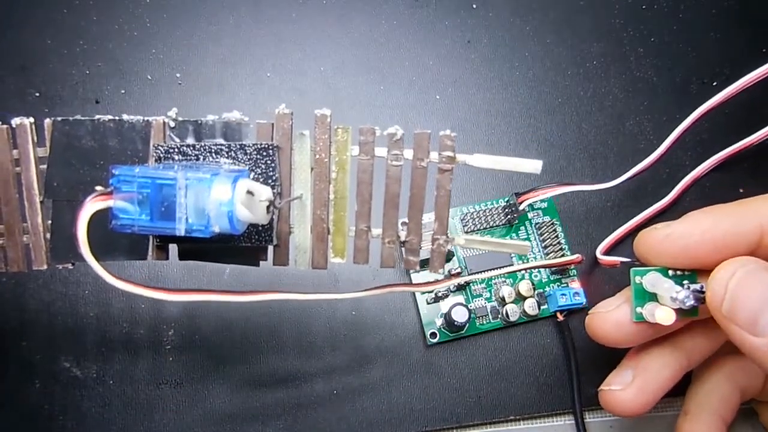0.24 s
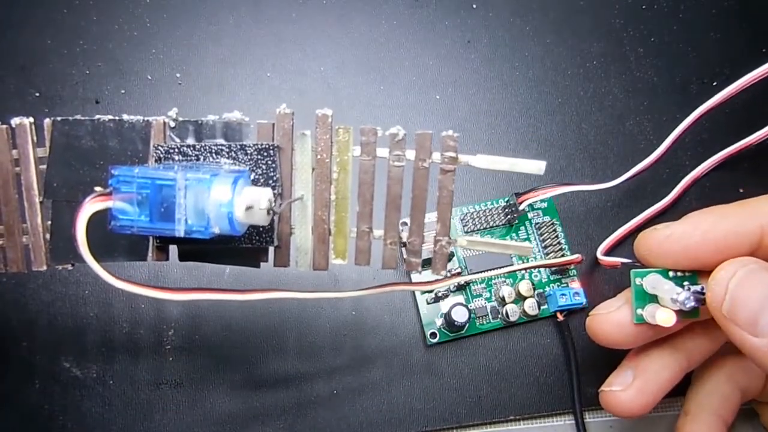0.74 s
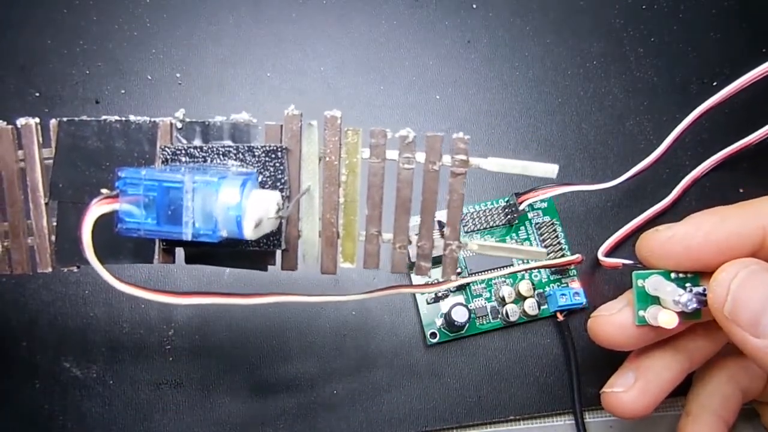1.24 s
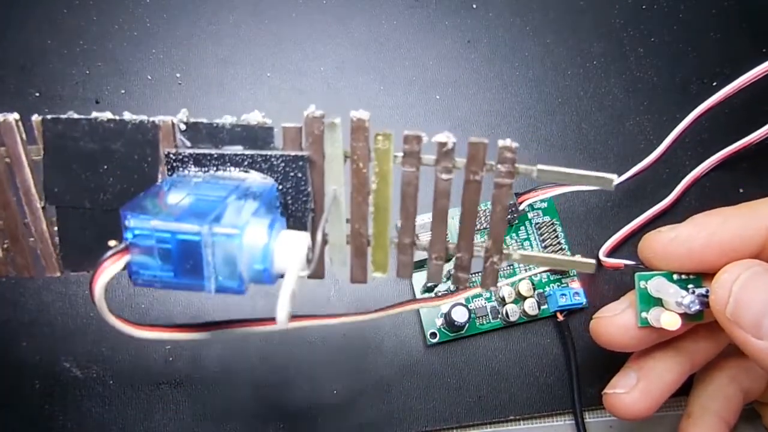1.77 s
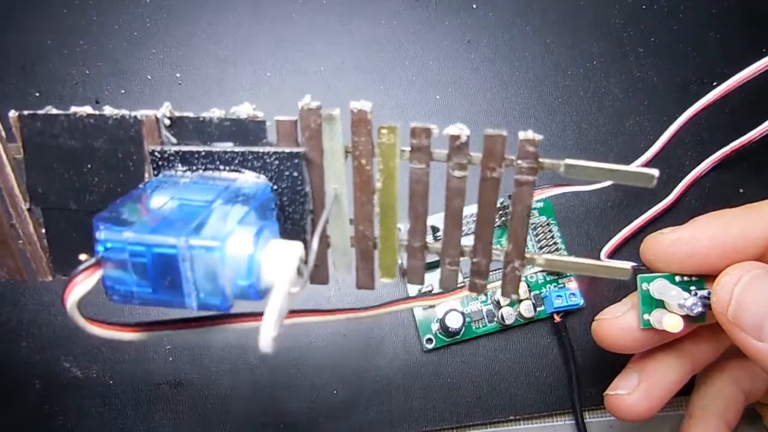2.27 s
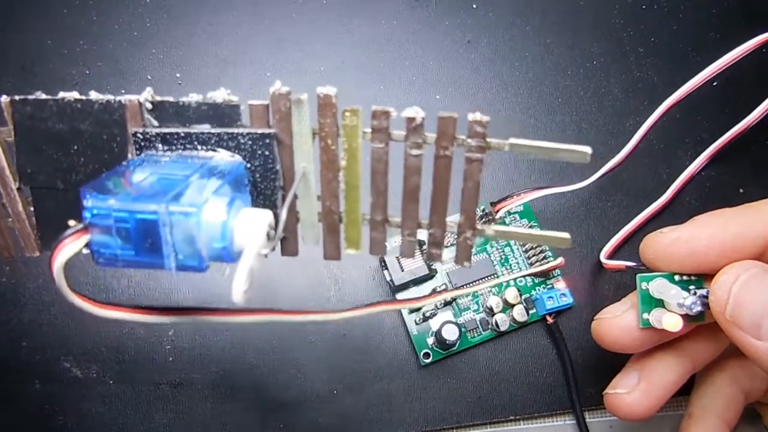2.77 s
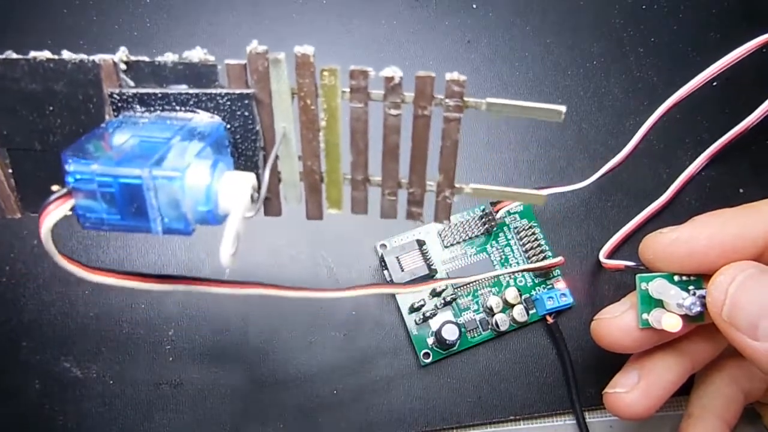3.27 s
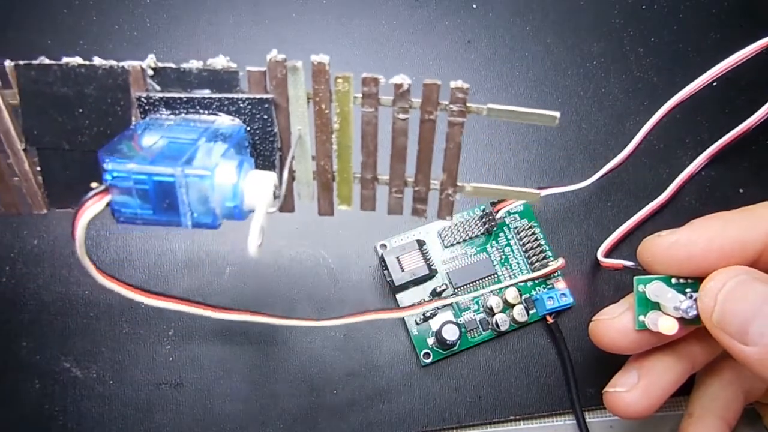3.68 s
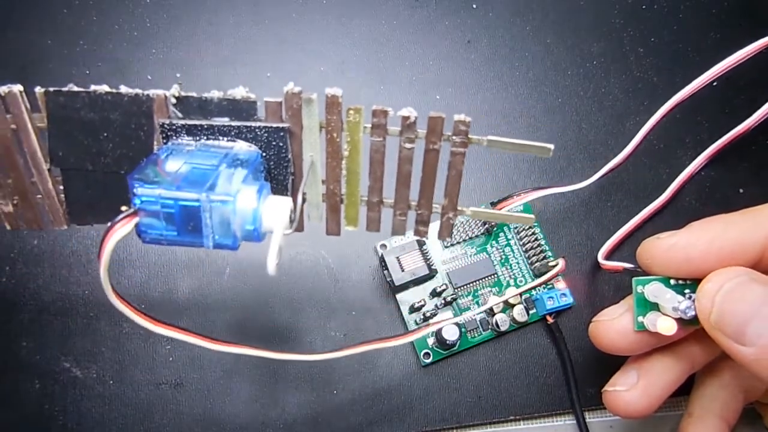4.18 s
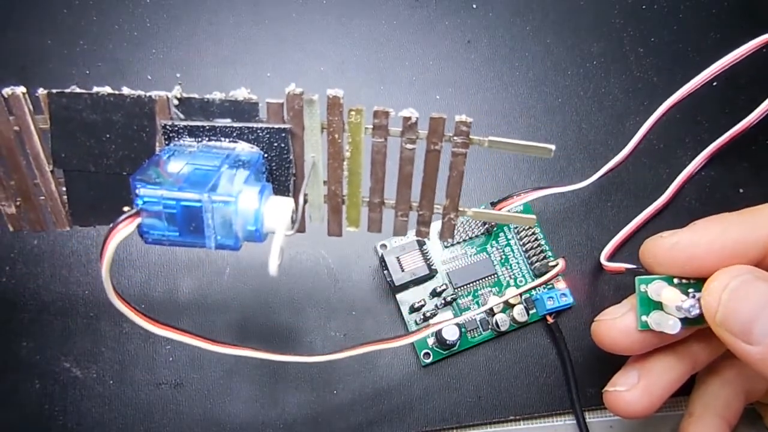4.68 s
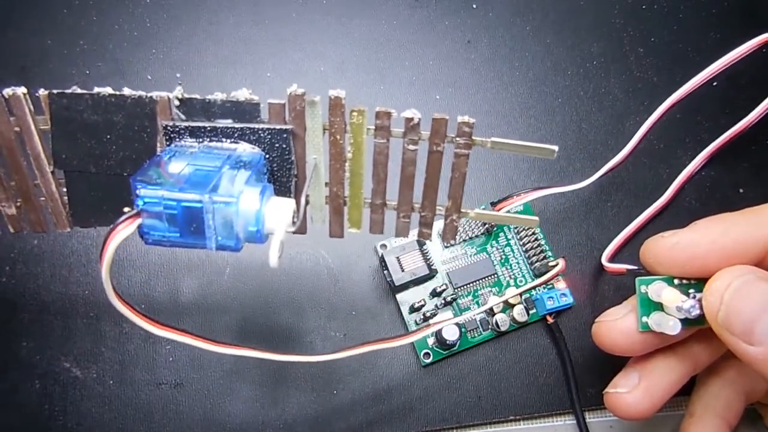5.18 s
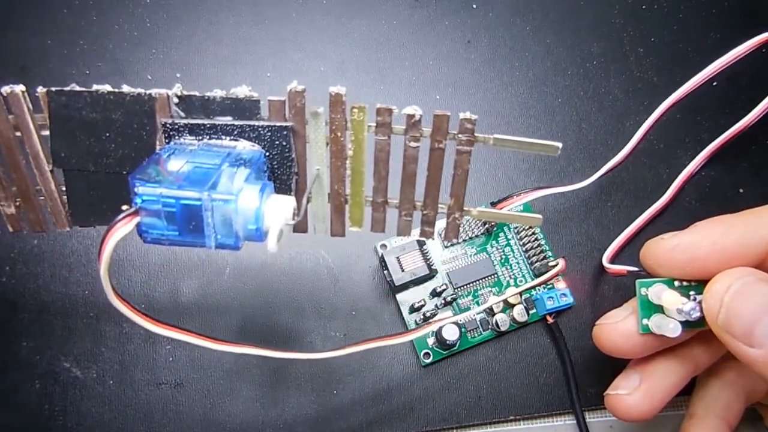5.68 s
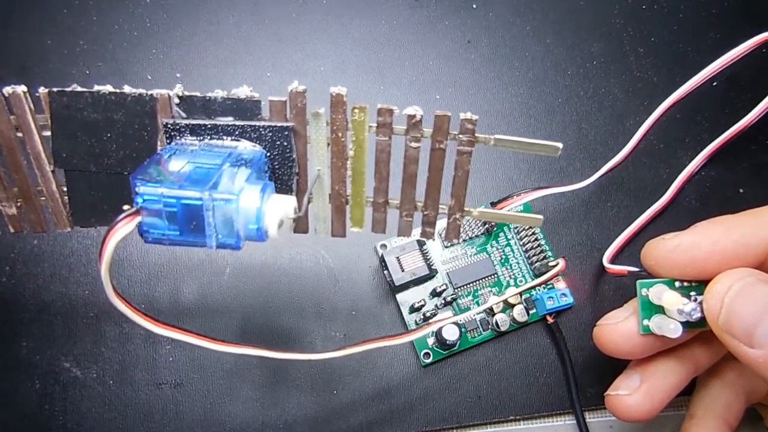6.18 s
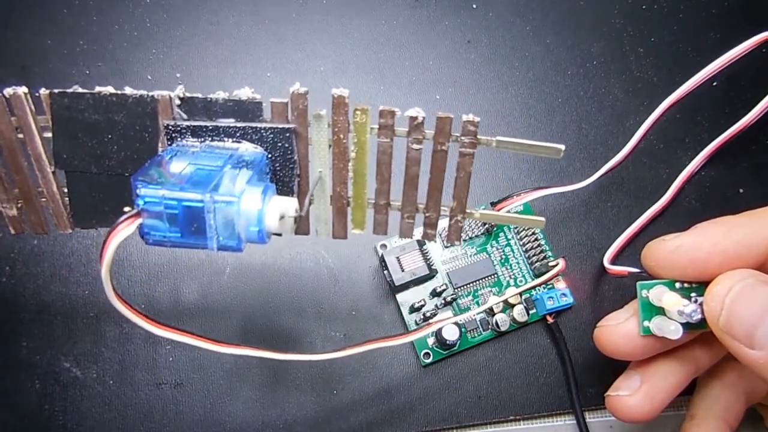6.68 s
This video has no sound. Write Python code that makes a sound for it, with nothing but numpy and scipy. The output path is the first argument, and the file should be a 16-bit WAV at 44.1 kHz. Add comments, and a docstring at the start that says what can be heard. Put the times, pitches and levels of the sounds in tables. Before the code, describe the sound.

Close, dry plastic gear ticking and short whirs, then a stalled motor's thin rapid buzz, a brief hush, a sharp snap and renewed clacking.

```python
"""Plastic gears clack and tick first: a hobby servo throws a model railway switch, then swings it back.
It sits on a workbench close to a two-port microphone, a little to one side, in a small quiet room.
Its controller kicks the motor some fifty times a second; the gears step, spin in short runs and buzz.
Against the end stop the motor strains, stalls and rings at every kick, and the loose track scuffs.
Shaped noise and pulses drive banks of resonances; short echoes, room air and a low hum lie around them."""
import sys
import numpy as np
from scipy import signal
from scipy.fft import rfft, irfft
from scipy.io import wavfile
from scipy.ndimage import uniform_filter1d

SR = 44100
rng = np.random.default_rng(int(sys.argv[2]) if len(sys.argv) > 2 else 0)


def master_out(mix):
    """Clip the mix to full scale and print it as 16-bit PCM to the path in sys.argv[1]."""
    frames = np.transpose(np.atleast_2d(mix))
    ceiling = np.clip(frames, -1, 1)
    pcm = np.round(ceiling * 32767).astype(np.int16)
    wavfile.write(sys.argv[1], SR, pcm)


N = 305613
TIME = np.arange(N) / SR  # s
FRAME_HZ = 50.598  # rate of the controller's kicks


def amp(db):
    """Decibels to gain."""
    return 10 ** (np.asarray(db) / 20)


def unit(x):
    """Scales to rms 1."""
    return x / np.sqrt(np.mean(x ** 2) + 1e-20)


def add(mix, s, sound):
    """Adds a sound at a time in seconds."""
    part = mix[max(round(s * SR), 0):][:len(sound)]
    part += sound[:len(part)]


def noise_pair(likeness):
    """White noise at two microphone ports; likeness is the share of power they have in common."""
    shared, own = rng.standard_normal(N), rng.standard_normal((2, N))
    common = np.clip(likeness, 0, 1)
    return np.sqrt(common) * shared + np.sqrt(1 - common) * own


def body(x, modes, size=4096):
    """Rings x through a set of resonances, causally (minimum phase) and with unit power gain."""
    hz = np.fft.rfftfreq(size, 1 / SR)
    power = sum(amp(db) ** 2 / (1 + ((hz - f) / width) ** 2) ** 2 for f, width, db in modes)
    cepstrum = irfft(np.log(unit(np.sqrt(power)) + 1e-5))
    # folding the cepstrum forward in time makes the response start at once
    cepstrum[1:size // 2] *= 2
    cepstrum[size // 2 + 1:] = 0
    response = irfft(np.exp(rfft(cepstrum)))
    return signal.oaconvolve(x, response[None], axes=1)[:, :N]


def bursts(rows, swell=3.08):
    """Power envelope of knocks (t/s, crest level/dB, decay/ms): a quick swell, then dying away."""
    power = np.zeros(N)
    u = np.linspace(-4, 8, 200)  # time in decay times, 0 at the crest
    shape = 2 / (np.exp(-swell * u) + np.exp(u))
    for s, db, decay_ms in rows:
        at = u * max(decay_ms, .1) / 1e3
        envelope = np.interp(np.arange(at[0], at[-1], 1 / SR), at, shape)
        add(power, s + at[0], (amp(db) * envelope) ** 2)
    return power


def frames(start, end, lag_ms):
    """Start times of the control frames whose kick falls in a stretch."""
    s = np.arange(N / SR * FRAME_HZ) / FRAME_HZ
    kick = s + lag_ms / 1e3
    return s[(kick >= start) & (kick <= end)]


# spectrum of the room air and microphone hiss: [f/Hz, relative level/dB]
AIR_SPECTRUM = [(15, -10.5), (42, -0.5), (70, -14), (160, -12.5), (270, -14), (640, -17.5), (1300, -14),
                (1900, -18.5), (15500, -21)]
AIR_DB = -56  # rms level of air and hiss
# a low wavering hum: [t/s, level/dB]
HUM_LEVEL = [(0, -71), (2.9, -71.5), (3.35, -60.5), (3.75, -74), (4.05, -67), (4.6, -72), (5.6, -69),
             (6.2, -65), (6.9, -79)]


def background(hum_hz=243, hum_width_hz=5, mono_hz=60):
    """Quiet room air and microphone hiss from filtered noise, and a low hum from a narrow noise band."""
    hz = np.fft.rfftfreq(N, 1 / SR)
    at, db = np.transpose(AIR_SPECTRUM)
    ports = rfft(noise_pair(0.23))
    middle = ports.mean(0)
    ports = middle + (ports - middle) * hz / (hz + mono_hz)  # long waves reach both ports alike
    air = irfft(ports * amp(np.interp(np.log(hz + 1), np.log(at + 1), db)), N)
    hum = irfft(rfft(noise_pair(0.81)) / (1 + ((hz - hum_hz) / hum_width_hz) ** 2), N)
    hum_level = amp(np.interp(TIME, *np.transpose(HUM_LEVEL)))
    return amp(AIR_DB) * unit(air) + hum_level * unit(hum)


def echoes(x, t60, wet_db, delay_ms):
    """A dense tail of reflections, different at each port, dying by 60 dB in t60 seconds."""
    t = np.arange(SR // 2) / SR
    decay = np.exp(-np.log(1000) * t / t60) * (t > delay_ms / 1e3)
    tail = rng.standard_normal((2, len(t))) * decay
    tail /= np.linalg.norm(tail, axis=1, keepdims=True)
    return amp(wet_db) * signal.oaconvolve(x, tail, axes=1)[:, :N]


# the track shifts on the bench: [t/s, crest level/dB, decay/ms]
TRACK_SCUFFS = [(2.286, -44.5, 12), (2.299, -40.5, 8.5), (2.311, -39, 6.8), (2.334, -39.5, 6.4),
                (2.349, -37, 7.1), (2.38, -42.5, 14), (2.3975, -33.5, 3.2), (2.4135, -39.5, 2.2),
                (2.423, -46, 18)]
# resonances of track and bench: [f/Hz, half-width/Hz, relative level/dB]
BENCH_MODES = [(435, 46, -6.5), (767, 19, -6), (967, 105, -0.5), (1260, 95, -4.5), (1580, 55, -8),
               (2300, 700, -30), (3920, 2400, -13.5)]


def scuffs():
    """Loose track shifts on the bench: short noise bursts ring both."""
    return body(np.sqrt(bursts(TRACK_SCUFFS)) * noise_pair(0.97), BENCH_MODES)


# ring of the throw wire while slack: [f/Hz, half-width/Hz, relative level/dB]
WIRE_MODES = [(4380, 200, 0)]


def slack_wire(power, wire_db=-11, damping_db_per_s=12):
    """Knocks shake the throw wire, less and less as the arm draws it tight."""
    ring = body(np.sqrt(power) * noise_pair(0.54), WIRE_MODES)
    return amp(wire_db - damping_db_per_s * TIME) * ring


# one dry snap as the servo wakes to swing back: [t/s, crest level/dB, decay/ms (bursts holds it to 0.1 or more)]
WAKING_SNAP = (4.3397, -11, 0.077)
# the case rings after the snap: [f/Hz, half-width/Hz, relative level/dB]
SNAP_MODES = [(5960, 400, -6), (8200, 810, -3), (11700, 1400, 1.5)]


def snap(ring_db=-23, ring_decay_ms=1.3, ring_lag_ms=0.31):
    """The bright ring of the case that follows the waking snap."""
    power = bursts([(WAKING_SNAP[0] + ring_lag_ms / 1e3, ring_db, ring_decay_ms)], swell=4)
    return body(np.sqrt(power) * noise_pair(0.93), SNAP_MODES)


# load on the motor as it strains and then stalls, one table a stretch:
# [t/s, motor ring drive level/dB, gear rattle base level/dB]
STRAIN_STRETCHES = [
    [(1.44, -58, -77), (1.86, -49.5, -48), (2.02, -44, -44), (2.4, -43, -43.5), (3.2, -45, -43.5),
     (3.815, -46, -43)],
    [(4.415, -49, -43), (4.575, -52, -37.5)],
]
# resonances of the straining or stalled motor: [f/Hz, half-width/Hz, relative level/dB]
MOTOR_MODES = [(3270, 33, -1), (3510, 144, 1), (3624, 34, 5.5), (3830, 280, -10)]
# resonances of its mount: [f/Hz, half-width/Hz, relative level/dB]
MOUNT_MODES = [(2140, 540, -7.5), (4380, 45, 0), (5125, 150, 7.5), (5480, 110, 8), (6220, 120, 5),
               (7100, 310, 4.5), (8860, 190, 2.5)]


def strain_ring(lag_ms=15.2, wind_up_ms=0.96, jitter_ms=0.026, rough_ms=0.89, rasp_db=-10,
                motor_db=-1, mount_db=-1.5):
    """Each kick jolts the mount, then rings the loaded motor, nearly alike from frame to frame."""
    jolts, rasps = np.zeros(N), []
    for stretch in STRAIN_STRETCHES:
        at, db, _ = np.transpose(stretch)
        s = frames(at[0], at[-1], lag_ms) + lag_ms / 1e3
        s = s + jitter_ms / 1e3 * rng.standard_normal(len(s))
        for t, level in zip(s, np.interp(s, at, db)):
            # a sinc places the pulse between samples
            near = round(t * SR) + np.arange(-10, 10)
            jolts[near] += amp(level) * np.sinc(near - t * SR) * np.sqrt(SR / FRAME_HZ)
            rasps.append((t, level, rough_ms))
    rasp = unit(np.sqrt(bursts(rasps)) * noise_pair(0.28)) * jolts.std()
    rasp *= amp(rasp_db)
    wound = np.roll(jolts + rasp, round(wind_up_ms * SR / 1e3), axis=1)
    port_gain = amp([[-1], [1]])  # the motor is louder at the second port
    motor = amp(motor_db) * body(wound, MOTOR_MODES) * port_gain
    return motor + amp(mount_db) * body(jolts[None], MOUNT_MODES)


def strain_rattle(lag_ms=15.1, crest_db=11, decay_ms=1.23, lead_ms=1.3, lead_db=-2, chatter_db=-6, scatter_db=-0.25):
    """Power envelope of loaded teeth: a small tick, the main kick, and fine chatter in between."""
    power = np.zeros(N)
    for stretch in STRAIN_STRETCHES:
        at, _, db = np.transpose(stretch)
        s = frames(at[0], at[-1], lag_ms) + lag_ms / 1e3
        levels = np.interp(s, at, db) + scatter_db * rng.standard_normal(len(s))
        kicks = list(zip(s, levels))
        power += bursts([(t, d + crest_db, decay_ms) for t, d in kicks])
        power += bursts([(t - lead_ms / 1e3, d + lead_db, decay_ms / 2) for t, d in kicks])
        chatter = amp(np.interp(TIME, at, db + chatter_db)) ** 2
        power += chatter * (TIME > at[0]) * (TIME < at[-1])
    return power


# the motor spins freely, then coasts: [t/s, length/s, starting level/dB, fade over the run/dB]
FREE_RUNS = [(0.148, .012, -32, 11), (0.186, 0.047, -30.5, 7.5), (0.445, 0.062, -35.5, 7.5),
             (0.544, 0.021, -24.5, 14.5), (0.605, 0.053, -35.5, 13), (0.679, 0.057, -33.5, 7),
             (0.763, 0.042, -36, 7), (0.818, 0.032, -31.5, 21), (0.858, 0.02, -33.5, 8.5),
             (1.807, 0.053, -40, 1.5), (3.812, .11, -37, -1), (3.917, 0.058, -43, 11.5),
             (4.377, 0.033, -28, 2), (4.676, .041, -27.5, 1.5), (4.752, 0.071, -26.5, 25),
             (4.851, 0.03, -29, 14), (5.006, 0.027, -33, 6), (5.054, 0.012, -29.5, 8),
             (5.444, 0.018, -31, 2.5)]
REST_S = 0.022  # after a free run the arm is ahead of its command, and the drive rests this long


def runs(tooth_hz=260, slowing=0.028, tooth_decay=0.83, smooth_share=0.079, scatter_db=4.5):
    """Power envelope of spinning gears: the tooth rate falls along with the level as the motor coasts."""
    power = np.zeros(N)
    for s, length, db, fade_db in FREE_RUNS:
        u = np.linspace(0, 1, int(length * SR))
        teeth = np.cumsum(tooth_hz * np.exp(-slowing * fade_db * u)) / SR  # teeth passed so far
        sizes = amp(scatter_db * rng.standard_normal(64))[teeth.astype(int) % 64]
        knocks = unit(smooth_share + sizes * np.exp(-(teeth % 1) / tooth_decay))
        level = amp(db - fade_db * u)
        add(power, s, (level * knocks * signal.windows.tukey(len(u), .1)) ** 2)
    return power


def resting(s):
    """Tells which times fall in a free run or in the rest that follows it."""
    start, length = np.transpose(FREE_RUNS)[:2, :, None]
    return ((s > start) & (s < start + length + REST_S)).any(0)


# force of the steady stepping, one table for the way out, one for the way back: [t/s, mean crest level/dB]
STEP_FORCE = [
    [(.14, -38), (.39, -41.5), (.87, -55), (1.03, -25.5), (1.17, -38.5), (1.4, -37), (1.51, -28),
     (1.74, -36.5), (1.81, -37), (1.88, -51)],
    [(4.88, -33.5), (5.2, -31.5), (5.47, -44.5), (5.7, -29), (6.1, -30.5), (6.25, -37), (6.33, -31),
     (6.45, -31), (6.51, -39), (6.64, -31.5), (6.93, -36.5)],
]
# a step lands this late in its frame, and ever later as the arm slows towards the end of its return
STEP_LAG_MS, SLOWING_FROM_S, LAG_MS_PER_S = 14, 5.616, 6.5
KICK_LAG_MS = 11.44  # the drive switches on with a faint tick at this same place in every driven frame


def steps(decay_ms=1.4, swell=1.62, scatter_db=3.5, jitter_ms=1.0, rebound_ms=7, rebound_db=-9, rebound_decay_ms=2.3,
          tick_db=-5, tick_scatter_db=4, tick_decay_ms=0.33):
    """Power envelope of one gear step a driven frame: a tick, the step, and a rebound as the backlash closes."""
    rows = []
    for stretch in STEP_FORCE:
        at, db = np.transpose(stretch)
        frame = frames(at[0], at[-1], STEP_LAG_MS)
        driven = ~resting(frame + STEP_LAG_MS / 1e3)
        size, early, bounce, late, tick = rng.standard_normal((len(frame), 5))[driven].T
        frame = frame[driven]
        lag_ms = STEP_LAG_MS + LAG_MS_PER_S * np.maximum(frame - SLOWING_FROM_S, 0)
        s = frame + (lag_ms + jitter_ms * early) / 1e3
        db = np.interp(s, at, db) + scatter_db * size
        ticks = zip(frame + KICK_LAG_MS / 1e3, db + tick_db + tick_scatter_db * tick)
        rebounds = zip(s + (rebound_ms + 5 * late) / 1e3, db + rebound_db + 2 * bounce)
        rows += [(t, d, tick_decay_ms) for t, d in ticks]
        rows += [(t, d, decay_ms) for t, d in zip(s, db)]
        rows += [(t, d, rebound_decay_ms) for t, d in rebounds]
    return bursts(rows, swell=swell)


# single clacks, hard and soft, as a kick throws the gear teeth across their backlash: [t/s, crest level/dB]
GEAR_CLACKS = [(.01, -36), (0.0494, -25), (0.1135, -24.5), (0.129, -33), (0.1627, -25.5), (0.1726, -29.5),
               (0.2268, -22), (0.3274, -24.5), (0.35, -27), (0.3707, -21), (0.389, -26), (.397, -21.5),
               (0.5714, -23), (0.7459, -20.5), (0.9033, -25), (0.9192, -21), (0.9598, -19), (0.9795, -18.5),
               (0.9991, -17), (1.0185, -21.5), (1.0397, -21.5), (1.099, -27), (1.1362, -24), (1.1799, -28),
               (1.1964, -19), (1.2361, -23), (1.2757, -19), (1.2946, -18.5), (1.3585, -18), (1.3789, -16.5),
               (1.3934, -24.5), (1.494, -24), (1.8153, -23), (3.8398, -23), (4.3897, -19.5), (4.873, -21),
               (4.912, -22.5), (4.9531, -26), (5.091, -24), (5.1146, -28), (5.148, -20.5), (5.1693, -19),
               (5.2143, -25.5), (5.251, -21), (5.3086, -21), (5.329, -22), (5.3713, -21), (5.3923, -24),
               (5.486, -21.5), (5.5291, -20.5), (5.5669, -21), (5.902, -26.5), (6.082, -21), (6.105, -21.5),
               (6.2036, -21)]


def clacks(decay_ms=0.83, swell=2.35, bounce_ms=3, bounce_db=-14, bounce_decay_ms=2.24):
    """Power envelope of the single clacks, each with a softer bounce of the teeth, and of the waking snap."""
    hits = [(s, db, decay_ms) for s, db in GEAR_CLACKS]
    bounces = [(s + bounce_ms / 1e3, db + bounce_db, bounce_decay_ms) for s, db in GEAR_CLACKS]
    return bursts(hits + bounces + [WAKING_SNAP], swell=swell)


def shifting_colour(x, depth_db=2, split_hz=9000):
    """Teeth strike at other spots, so the balance of dull and bright ringing keeps shifting at random."""
    hz = np.fft.rfftfreq(N, 1 / SR)
    dull = irfft(rfft(x) / (1 + (hz / split_hz) ** 8), N)
    bright = x - dull
    tilt = depth_db * unit(uniform_filter1d(rng.standard_normal(N), size=300))
    mean_gain = np.sqrt((amp(tilt) ** 2 + amp(-tilt) ** 2) / 2)
    return (dull * amp(tilt) + bright * amp(-tilt)) / mean_gain


# resonances of the gears: [f/Hz, half-width/Hz, relative level/dB]
GEAR_MODES = [(6450, 390, -3.5), (6920, 500, -3), (7580, 690, -1.5), (8510, 780, -4), (9300, 680, -0.5),
              (10590, 730, 0), (11100, 190, -7.5), (11800, 430, -18.5), (12210, 680, 4), (13700, 870, -13),
              (14300, 940, -0.5), (16400, 1200, -8)]
# resonances of the gearbox case: [f/Hz, half-width/Hz, relative level/dB]
CASE_MODES = [(895, 82, -10.5), (1252, 266, -8), (2446, 352, -0.5), (3607, 555, -1.5), (4250, 130, 1.5),
              (4630, 410, -0.5), (5670, 510, 0.5)]
# drift of the case's ring under the gear noise, added to case_db: [t/s, relative level/dB]
CASE_DRIFT = [(0, -2.5), (1.1, -1.5), (1.8, 2.5), (2, 0), (3.8, -1), (4.7, -2), (5.4, 0.5), (6.3, 2),
              (6.93, 2)]


def gearbox(power, grain_db=2.5, case_db=-45, knee_db=-36, case_growth=0.63):
    """Clusters of tiny impacts ring gears and case; the case grows less with force, so harder knocks are brighter."""
    grain = amp(grain_db * np.repeat(rng.standard_normal(N), 8)[:N])
    # the impacts share out the energy of each knock
    force = np.sqrt(power / uniform_filter1d(grain ** 2, size=96)) * grain
    gears = body(force * noise_pair(0.66), GEAR_MODES)
    coupling = amp(case_db + np.interp(TIME, *np.transpose(CASE_DRIFT)))
    case_force = coupling * (force / amp(knee_db)) ** case_growth
    return shifting_colour(gears) + body(case_force * noise_pair(0.87), CASE_MODES)


def scene(port_lag_ms=0.018):
    """Servo and track on the bench, a little to one side, in a small quiet room."""
    knocks = clacks() + runs() + steps() + strain_rattle()
    servo = gearbox(knocks) + strain_ring() + slack_wire(knocks) + snap()
    near = servo + scuffs()
    # sound reaches the second port slightly later
    hz = np.fft.rfftfreq(N, 1 / SR)
    near[1] = irfft(rfft(near[1]) * np.exp(-2j * np.pi * hz * port_lag_ms / 1e3), N)
    bench = echoes(near, t60=0.026, wet_db=-10, delay_ms=2.3)
    room = echoes(near, t60=0.069, wet_db=-20.5, delay_ms=15)
    return near + bench + room + background()


EDGE_HZ = 15950  # upper edge of the recorder's band


def record(dry):
    """The recorder's band limit: a steep linear-phase low-pass."""
    lowpass = signal.firwin(255, EDGE_HZ, window=("kaiser", 8), fs=SR)
    return signal.oaconvolve(dry, lowpass[None], "same", axes=1)


dry = scene()
out = record(dry)
master_out(out)
```